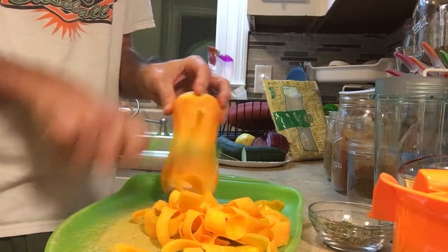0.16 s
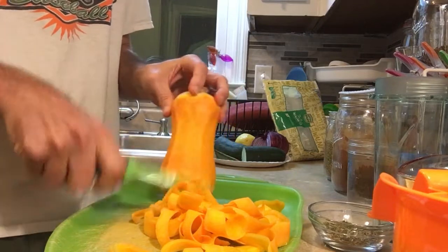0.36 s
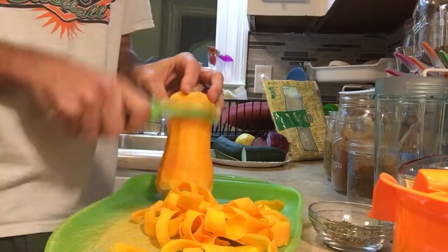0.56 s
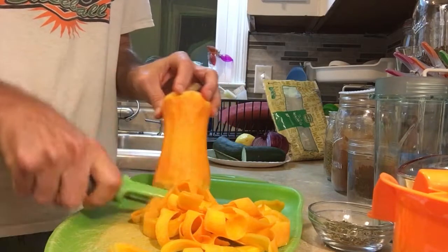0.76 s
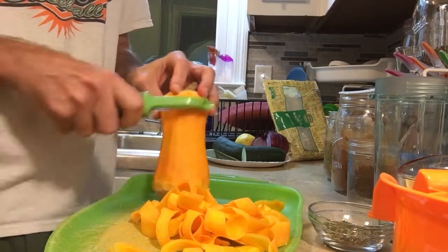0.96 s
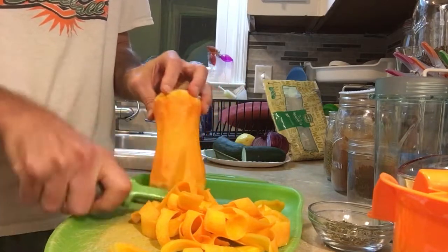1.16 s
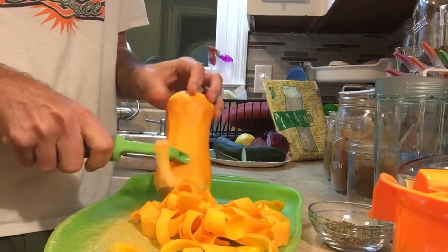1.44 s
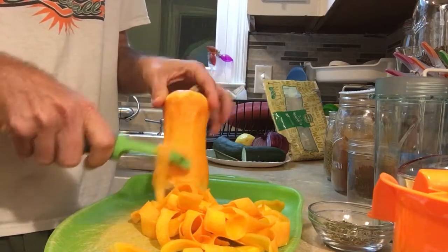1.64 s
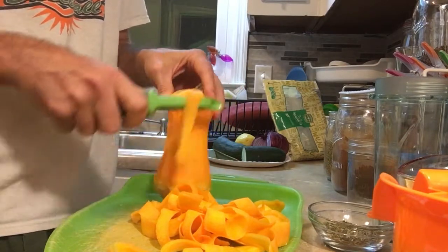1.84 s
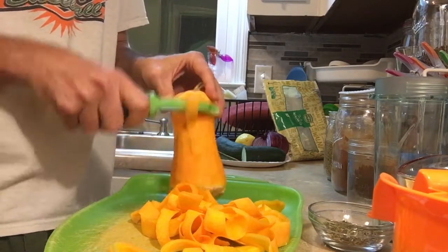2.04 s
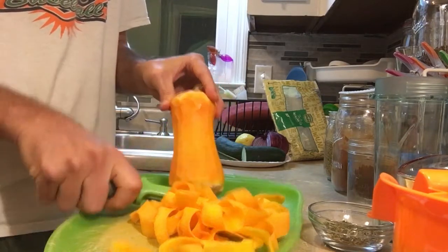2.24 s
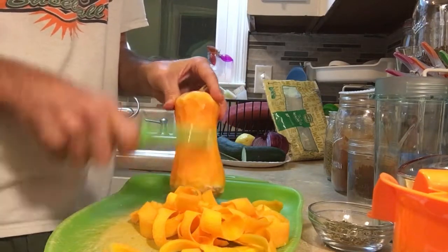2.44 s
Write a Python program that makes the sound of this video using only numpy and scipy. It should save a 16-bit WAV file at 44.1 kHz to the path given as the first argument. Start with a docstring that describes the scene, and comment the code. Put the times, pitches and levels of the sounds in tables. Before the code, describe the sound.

Squash being peeled close up: blade ticks, brief crisp scrapes and hard hollow knocks on plastic

```python
"""A hand peeler shaves a raw squash on a plastic tray, close to the microphone in a small kitchen.
Each stroke: the steel blade ticks as it bites, tearing fibres hiss, and the peeler knocks on the tray.
Clicks and noise drive the blade and flesh resonances; knocks are cracks with decaying modes.
Brief whistles join in; a rough 3 kHz tone swells into some knocks. Behind lie a short room tail, room
noise, a soft mid and treble rustle and a fridge hum; the recorder limits the knocks."""
import sys
import numpy as np
from scipy import signal
from scipy.fft import rfft, irfft
from scipy.io import wavfile
from scipy.ndimage import uniform_filter1d, minimum_filter1d

SR = 44100
rng = np.random.default_rng(int(sys.argv[2]) if len(sys.argv) > 2 else 0)


def unload_audio(sound):
    """Save the sound as a 16-bit wav file, at the path given as the first command line argument."""
    columns = np.transpose(np.atleast_2d(sound))
    # keep every value between -1 and 1, then stretch to whole-number steps
    steps = np.round(np.clip(columns, -1, 1) * 32767)
    wavfile.write(sys.argv[1], SR, steps.astype(np.int16))


N = 114660

# peeling strokes, one list of points each: time_s, hiss_db, flesh_rumble_db, low_shake_db
STROKE_CURVES = [
    [(0.095, -55, -75, -49), (0.119, -61, -61, -60.5), (0.141, -48.5, -57, -50), (0.175, -38.5, -38.5, -67),
     (0.199, -44, -38, -61.5), (0.213, -51.5, -30, -51.5), (0.219, -49, -36, -39)],
    [(0.575, -70, -51, -54), (0.581, -56, -48, -56), (0.609, -47.5, -53, -49.5), (0.639, -39, -37.5, -59),
     (0.651, -42, -33, -57.5), (0.673, -49.5, -39.5, -44.5), (0.685, -44.5, -27.5, -60.5),
     (0.692, -42.5, -38, -47)],
    [(1.01, -54, -52.5, -62), (1.036, -62.5, -71, -62.5), (1.046, -55, -59.5, -61),
     (1.054, -50.5, -64, -60.5), (1.07, -40, -48, -61.5), (1.086, -42.5, -39.5, -54.5),
     (1.132, -52, -35.5, -64.5), (1.144, -40.5, -29, -45.5)],
    [(2.095, -49.5, -59, -62.5), (2.109, -54.5, -65.5, -73), (2.143, -69.5, -68, -55),
     (2.171, -49, -58, -59), (2.201, -42, -44.5, -55), (2.215, -46, -35.5, -54), (2.227, -54, -54, -52),
     (2.236, -49, -39, -49)],
]
# tone of the tearing fibres: frequency_hz, density_db (per Hz)
HISS_SPECTRUM = [(1290, -43), (2200, -4.5), (3150, -14), (4330, 3.5), (5360, -10.5), (6010, 1.5),
                 (8060, -15), (13200, -11.5), (15500, -31.5)]
# resonances of the squash flesh: frequency_hz, width_hz, level_db
FLESH_RESONANCES = [(542, 15, -6), (1239, 210, -1), (1550, 180, -4.5), (1918, 110, -15)]
# modes of the steel blade: frequency_hz, level_db, t60_s, swell_s
BLADE_MODES = [(2540, -6, .016, .0005), (2950, -8, .016, .0005), (4450, -5, .012, .0005),
               (5300, -4, .008, .0005), (6000, -2, .018, .0005), (8200, -14, .012, .001),
               (9500, -12, .012, .001), (12830, -23, .07, .001), (13750, -24, .08, .002),
               (14750, -28, .06, .002)]
# blade whistles as it glides: start_s, length_s, level_db, from_hz, to_hz
WHISTLE_GLIDES = [(0.124, .06, -53, 5930, 6040), (0.586, .025, -48, 5840, 6060),
                  (.628, 0.026, -42, 5950, 6050), (1.064, .07, -42.5, 5620, 6340),
                  (2.157, .02, -56, 6160, 6300)]
# blade ticks: start_s, level_db, brightest_hz, length_s, steel_ring_db, dull_tap_db, tap_hz
BLADE_TICKS = [(0.0748, -24, 4430, 0.0043, -6, -38.5, 545), (0.222, -16, 5100, .001, -2, -77, 1280),
               (0.556, -25.5, 5300, 0.0041, -6, -36.5, 658), (0.603, -36.5, 4516, 0.0027, -3.5, -53.5, 598),
               (0.9865, -27.5, 5360, 0.0033, -4.5, -44, 593),
               (0.9903, -21.5, 5000, 0.0013, -0.5, -50.5, 640),
               (1.0443, -30, 4590, 0.00086, -11, -62, 1300), (1.07, -37, 4460, 0.0034, -7.5, -62.5, 600),
               (1.4453, -64, 1963, 0.001, -23.5, -47.5, 1284), (2.0789, -33.5, 4730, 0.0022, -4, -50, 1420),
               (2.0844, -35, 5960, 0.0036, 1.5, -66, 604), (2.244, -35, 4450, 0.0057, -2, -50, 1320)]
# tone of a tick: frequency_hz, density_db (per Hz)
TICK_SPECTRUM = [(180, -60.5), (300, -11.5), (1840, -21.5), (2560, -6.5), (3280, -14.5), (5210, -3.5),
                 (7500, -17), (14000, -37), (15500, -45)]
# knocks on the tray: start_s, ring_db, crack_db, low_thud_db, middle_thud_db, blade_ring_db,
# counter_wobble_db, clack_db, crack_top_hz, upper_thud_db, rebound_db
TRAY_KNOCKS = [(0.2274, -10.5, -6.5, -21.5, -20.5, -10, -50, -44, 16000, -11.5, -7),
               (0.6997, -11, -7, -22.5, -18.5, -25, -52, -27, 13800, -17, -5.5),
               (1.1524, -11.5, -7, -21.5, -17.5, -7.5, -64, -10.5, 13800, -12.5, -7),
               (2.2507, -13, -6.5, -26.5, -19.5, -32, -41, -1, 15000, -12, -1.5),
               (2.3079, -25.5, -10, -25, -20, -52, -60, -38, 2060, -5.5, -5)]
# modes of the plastic tray before it is damped: frequency_hz, level_db, t60_s, swell_s
TRAY_MODES = [(547.8, -3.5, 0.19, 0.0032), (977, 8.5, 0.087, 0.0032), (1060, -6.5, 0.023, 0.023),
              (1122, -11, 0.022, 0.00094), (1487, 7.5, 0.014, 0.00095), (1425, 2.5, 0.06, 0.00015),
              (1537, -6, 0.038, 0.0014), (1790, -25, 0.028, 0.0054), (2178, -5.5, 0.033, 0.00033),
              (2619, -8.5, 0.18, 0.0026), (3390, -19, 0.11, 0.00031)]
# modes of squash and counter: frequency_hz, level_db, t60_s, swell_s
THUD_MODES = [(103, -5, 0.18, 0.013), (130.4, 14.5, 0.07, 0.0037), (204, -9.5, 0.2, 0.0091),
              (273, 1.5, 0.11, 0.0074), (330.1, 9, .08, 0.0058), (397, 3, 0.071, 0.0011),
              (483.4, 6.5, 0.064, 0.0029), (588.3, -1.5, 0.055, 0.0035), (720, -10.5, 0.072, 0.0063)]
# tone of a knock's crack: frequency_hz, density_db (per Hz)
CRACK_SPECTRUM = [(530, -28), (900, -2), (1880, -3.5), (3180, -12), (4490, -19), (5910, -13), (7060, -25),
                  (8340, -15), (10700, -29.5), (14400, -23), (15500, -40)]
# quick rebounds after a knock: delay_s, level_db
REBOUND_CONTACTS = [(.0045, 3.5), (.0085, 3.5), (0.0118, -0.5)]
# a knock favours the three highest blade modes: boost_db
SIDEWAYS_BOOST_DB = [4.5, 4, 4]
# rough 3 kHz tones swelling into a knock: stop_s, level_db, pitch_hz, swell_s
SWELLING_TONES = [(0.6995, -22.5, 2950, 0.0037), (1.1528, -17.5, 2995, 0.0027),
                  (2.2524, -13.5, 2954, 0.0033)]
# dying of the kitchen's reverberation: frequency_hz, t60_s, level_db
ROOM_DECAY = [(101, 0.59, -5.5), (298, 0.48, -3), (785, 0.17, 4), (997, 0.5, -8), (1507, 0.33, -2.5),
              (2530, 0.32, 0), (4020, 0.32, -2), (8090, 0.31, -4), (14000, 0.17, 3)]
# tone of the steady room noise: frequency_hz, density_db (per Hz)
AIR_SPECTRUM = [(15, -58.5), (25, -29), (48, -5), (219, -20), (301, -6.5), (450, -20), (543, -21),
                (769, -34), (1030, -25.5), (1120, -36.5), (4000, -41), (15000, -62)]
# fridge hum: pitch_hz, level_db (rms)
HUM_TONES = [(59.2, -80.5), (296.1, -62.5), (532.9, -72.5), (1184, -79.5)]
# loudness of the soft mid and treble rustle: time_s, level_db
RUSTLE_CURVES = [
    [(0, -62.5), (.07, -60), (.3, -62), (.46, -59), (.55, -60.5), (.8, -60), (.97, -58.5), (1.3, -57.5),
     (1.44, -58.5), (1.47, -63.5), (1.575, -64), (1.585, -74.5), (1.75, -72), (1.87, -62), (1.93, -59.5),
     (2.0, -62.5), (2.07, -65.5), (2.4, -55), (2.5, -58), (2.6, -59)],
]
# tone of the rustle: frequency_hz, density_db (per Hz)
RUSTLE_SPECTRUM = [(350, -44), (600, -2), (856, -15.5), (952, -5), (1940, -9.5), (2590, -14), (4630, -18.5),
                   (12000, -32.5), (15000, -49.5)]

# strokes; chatter and patches are rms swings
FIBRES_PER_S, FIBRE_DB, SING_DB, CHATTER_DB, PATCHY_DB = 3500, -3, -5, 2, 2.5
SHAKE_HZ, SHAKE_WIDTH_HZ = 115, 90  # each of two passes
FOLLOW_S = 0.0042  # hold after a level curve's last point
WHISTLE_WIDTH_HZ = 180
TICK_WIDTH_HZ, TICK_PEAK_DB, TAP_T60_S = 690, 7, .04
# knocks; the snap is the first contact, judder the rms unevenness of the tray's ring
CRACK_S, RATTLE_DB, RATTLE_S, SNAP_DB = 0.00043, -10, 0.02, 9.5
CLACK_HZ, CLACK_WIDTH_HZ = 3000, 450
PRESS_S, PRESS_T60_S, JUDDER_DB = .0135, .04, 4
WOBBLE_HZ, WOBBLE_PEAK_S = 46, .1
TONE_FADE_S, TONE_ROUGH_DB = 0.0008, 5
SPREAD_DB, DETUNE_HZ = 1.5, 7  # random spread of each mode's level, and of its pitch at 1 kHz
ROOM_DB, STROKE_ROOM_DB, SHIFT_PER_S = -10, -12, 22
AIR_DB, WAVER_DB = -59, 2.5  # rms level of the room noise, rms swing of the hum
LIMIT_DB, RELEASE_DB_PER_S = -3.6, 400
LOW_CUT_HZ, TOP_HZ, TOP_DB, EDGE_HZ = 38, 15300, -18, 16100


def amp(db):
    """Amplitude factor of a level in dB."""
    return 10 ** (np.asarray(db) / 20)


def evened(x):
    """The sound at an rms of 1."""
    return x / np.sqrt(np.mean(x ** 2) + 1e-20)


def read(points, hz):
    """Values between a table's points, along a log frequency axis."""
    f, value = np.transpose(points)
    return np.interp(np.log(hz + 1), np.log(f + 1), value)


def add(mix, start_s, sound):
    """Lays a sound into the mix in place."""
    part = mix[round(start_s * SR):][:len(sound)]
    part += sound[:len(part)]


def slow_noise(shape, size):
    """Smoothed noise with an rms of 1, for uneven levels."""
    return evened(uniform_filter1d(rng.standard_normal(shape), size))


def colour(x, spectrum):
    """Minimum-phase filter of a spectrum; it falls 24 dB per octave below the first point."""
    hz = np.abs(np.fft.fftfreq(4096, 1 / SR))
    low_db = 24 * np.log2(np.clip(hz / spectrum[0][0], .05, 1))
    log_gain = np.log(amp(read(spectrum, hz) + low_db))
    min_phase = signal.hilbert(log_gain).imag
    taps = np.fft.ifft(np.exp(log_gain - 1j * min_phase)).real[:2048]
    return signal.oaconvolve(x, taps / np.linalg.norm(taps))[:len(x)]


def resonate(x, hz, width):
    """A resonance of gain 1 whose pitch may glide: shifted to 0 Hz, smoothed, shifted back."""
    turn = np.exp(2j * np.pi * np.cumsum(hz * np.ones(len(x))) / SR)
    r = np.exp(-np.pi * width / SR)
    return 2 * (turn * signal.lfilter([1 - r], [1, -r], x / turn)).real


def ring(modes):
    """Modes that swell and die, with random spread in level and pitch."""
    t = np.arange(SR // 3) / SR
    hz, db, t60, swell = np.transpose(modes)[..., None]
    db = db + SPREAD_DB * rng.standard_normal(hz.shape)
    hz = hz + DETUNE_HZ * np.sqrt(hz / 1000) * rng.standard_normal(hz.shape)
    onset = (1 - np.exp(-t / np.abs(swell))) ** 2
    return (amp(db - 60 * t / t60) * onset * np.sin(2 * np.pi * hz * t)).sum(0)


def level(curves, col):
    """Gain along the curves, held a moment at the end, silent between them."""
    t, gain = np.arange(N) / SR, np.zeros(N)
    for curve in curves:
        times = [row[0] for row in curve] + [curve[-1][0] + FOLLOW_S]
        levels = [row[col] for row in curve] + [curve[-1][col]]
        gain += amp(np.interp(t, times, levels, -120, -120))
    return uniform_filter1d(gain, 200)


def patchy(x):
    """Bands of about 700 Hz swell and sink every 20 ms or so."""
    z = signal.stft(x, nperseg=256)[2]
    patches = uniform_filter1d(rng.standard_normal(z.shape), size=4, axis=0)
    patches = evened(uniform_filter1d(patches, size=6, axis=1))
    return evened(signal.istft(z * amp(PATCHY_DB * patches), nperseg=256)[1][:N])


def strokes():
    """Fibres tear in dense clicks: hiss, singing blade, uneven flesh rumble; squash and tray shake."""
    fibres = amp(FIBRE_DB * np.minimum(rng.exponential(1, N), 4))
    fibres *= rng.random(N) < FIBRES_PER_S / SR
    fibres *= rng.choice([-1., 1.], N)
    sing = evened(signal.oaconvolve(fibres, ring(BLADE_MODES))[:N])
    hiss = patchy(evened(colour(fibres, HISS_SPECTRUM)) + amp(SING_DB) * sing)
    chatter = amp(CHATTER_DB * slow_noise(N, 250))
    push = rng.standard_normal(N) * chatter
    flesh = evened(sum(amp(db) * resonate(push, hz, width) for hz, width, db in FLESH_RESONANCES))
    shake = resonate(push, SHAKE_HZ, SHAKE_WIDTH_HZ)
    shake = evened(resonate(shake, SHAKE_HZ, SHAKE_WIDTH_HZ))
    parts = [hiss, flesh, shake]
    return sum(level(STROKE_CURVES, col) * part for col, part in enumerate(parts, 1))


def whistles():
    """The gliding blade whistles: narrow noise that swells, drifts up in pitch and fades."""
    out = np.zeros(N)
    for start_s, length_s, db, from_hz, to_hz in WHISTLE_GLIDES:
        u = np.linspace(0, 1, round(length_s * SR))
        noise = rng.standard_normal(SR // 5)[:len(u)]
        tone = evened(resonate(noise, from_hz + (to_hz - from_hz) * u, WHISTLE_WIDTH_HZ))
        swell = np.sqrt(np.sin(np.pi * u) + 1e-9)
        add(out, start_s, amp(db) * swell * tone)
    return out


def ticks():
    """The loose blade snaps over and bites: a puff of noise, the steel ringing, a dull tap."""
    out, t = np.zeros(N), np.arange(SR // 5) / SR
    for start_s, db, bright_hz, length_s, steel_db, tap_db, tap_hz in BLADE_TICKS:
        # the puff is strongest at half its length
        puff = rng.standard_normal(len(t)) * t / length_s * np.exp(1 - t / length_s * 2)
        steel = ring(BLADE_MODES[:-2])
        steel = signal.oaconvolve(puff, steel / np.linalg.norm(steel))[:len(t)]
        bright = colour(puff, TICK_SPECTRUM) + amp(steel_db) * steel
        bright += amp(TICK_PEAK_DB) * resonate(puff, bright_hz, TICK_WIDTH_HZ)
        tap = amp(tap_db - 60 * t / TAP_T60_S) * np.sin(2 * np.pi * tap_hz * t)
        add(out, start_s, amp(db) * bright + tap)
    return out


def knocks():
    """Crack and rattle; the tray rings through rebounds until damped; squash, blade, counter follow."""
    out, t = np.zeros(N), np.arange(SR // 3) / SR
    contacts = np.zeros(SR // 20)
    for delay_s, db in REBOUND_CONTACTS:
        add(contacts, delay_s, amp([db]))
    sideways = [(hz, db + boost_db, t60, swell)
                for (hz, db, t60, swell), boost_db in zip(BLADE_MODES[-3:], SIDEWAYS_BOOST_DB)]
    damp = amp(-60 * np.maximum(t - PRESS_S, 0) / PRESS_T60_S)
    for (start_s, ring_db, crack_db, low_db, middle_db, blade_db, wobble_db, clack_db,
         top_hz, upper_db, rebound_db) in TRAY_KNOCKS:
        envelope = np.exp(-t / CRACK_S) + amp(RATTLE_DB) * np.exp(-t / RATTLE_S)
        burst = rng.standard_normal(len(t)) * envelope
        add(burst, 0, amp([SNAP_DB]))
        low_pass = signal.butter(4, min(top_hz, .45 * SR), fs=SR, output="sos")
        crack = signal.sosfilt(low_pass, colour(burst, CRACK_SPECTRUM))
        clack = resonate(burst, CLACK_HZ, CLACK_WIDTH_HZ)

        tray = ring(TRAY_MODES)
        tray = damp * (tray + amp(rebound_db) * signal.oaconvolve(tray, contacts)[:len(t)])
        tray *= amp(JUDDER_DB * slow_noise(len(t), 150) * np.minimum(t / PRESS_S, 1))

        swell = (t / WOBBLE_PEAK_S * np.exp(1 - t / WOBBLE_PEAK_S)) ** 4
        wobble = swell * np.sin(2 * np.pi * WOBBLE_HZ * t)
        knock = amp(crack_db) * crack + amp(clack_db) * clack
        knock += amp(ring_db) * tray + amp(wobble_db) * wobble
        knock += amp(low_db) * ring(THUD_MODES[:3]) + amp(middle_db) * ring(THUD_MODES[3:7])
        knock += amp(upper_db) * ring(THUD_MODES[7:]) + amp(blade_db) * ring(sideways)
        add(out, start_s, knock)
    return out


def swelling_tones():
    """A rough 3 kHz tone swells exponentially into the knock and fades at once."""
    out, t = np.zeros(N), np.arange(-SR // 20, SR // 20) / SR
    for stop_s, db, hz, swell_s in SWELLING_TONES:
        rough = amp(db + TONE_ROUGH_DB * slow_noise(len(t), 80))
        swell = np.exp(np.where(t < 0, t / swell_s, -t / TONE_FADE_S))
        add(out, stop_s + t[0], rough * swell * np.sin(2 * np.pi * hz * t))
    return out


def room(x):
    """Three tails of sparse taps, bands dying at their own speeds, trade places steadily: a blurred room."""
    out, at = np.zeros(N), np.arange(200, SR - 20, 20)
    for k in range(3):
        taps = np.zeros(SR)
        taps[at + rng.integers(0, 20, len(at))] = rng.choice([-1., 1.], len(at))
        hz, t, z = signal.stft(taps, SR, nperseg=256)
        t60, db = (read([(row[0], row[col]) for row in ROOM_DECAY], hz)[:, None] for col in (1, 2))
        tail = signal.istft(z * amp(db - 60 * t / t60), SR, nperseg=256)[1]
        # the squares of the three shares always sum to 1
        turns = SHIFT_PER_S * np.arange(N) / SR + k / 3
        share = np.sqrt(2 / 3) * np.cos(2 * np.pi * turns)
        out += share * signal.fftconvolve(x, tail / np.linalg.norm(tail))[:N]
    return out


def kitchen():
    """Steady shaped room noise, slightly wavering sines for the fridge, and the noise rustle."""
    hz, t = np.fft.rfftfreq(N, 1 / SR), np.arange(N) / SR
    air = irfft(rfft(rng.standard_normal(N)) * amp(read(AIR_SPECTRUM, hz)), N)
    hum = np.zeros(N)
    for pitch_hz, db in HUM_TONES:
        waver = amp(db + WAVER_DB * slow_noise(N, 3000))
        hum += np.sqrt(2) * waver * np.sin(2 * np.pi * pitch_hz * t)
    rustle = evened(colour(rng.standard_normal(N), RUSTLE_SPECTRUM))
    return amp(AIR_DB) * evened(air) + hum + level(RUSTLE_CURVES, col=1) * rustle


def scene():
    """Peeling and knocks heard close, their room tails, and the kitchen behind."""
    cuts = strokes() + whistles() + ticks()
    hits = knocks() + swelling_tones()
    tails = room(amp(ROOM_DB) * hits + amp(STROKE_ROOM_DB) * cuts)
    return (cuts + hits + tails + kitchen())[None]


def record(dry):
    """A look-ahead limiter holds the knocks; deep bass is cut, the top treble is weak, then cut."""
    over_db = np.maximum(20 * np.log10(np.abs(dry[0]) + 1e-9) - LIMIT_DB, 0)
    # after a peak the gain recovers at a steady rate in dB
    fall_db = np.arange(N) * RELEASE_DB_PER_S / SR
    cut_db = np.maximum.accumulate(over_db + fall_db) - fall_db
    gain_db = uniform_filter1d(minimum_filter1d(-cut_db, size=41), size=41)
    held = dry * amp(gain_db)
    held = signal.sosfilt(signal.butter(3, LOW_CUT_HZ, "high", fs=SR, output="sos"), held)
    top, edge = (signal.firwin(255, hz, window=("kaiser", 9), fs=SR) for hz in (TOP_HZ, EDGE_HZ))
    return signal.oaconvolve(held, (top + amp(TOP_DB) * (edge - top))[None], "same")


dry = scene()
out = record(dry)
unload_audio(out)
```